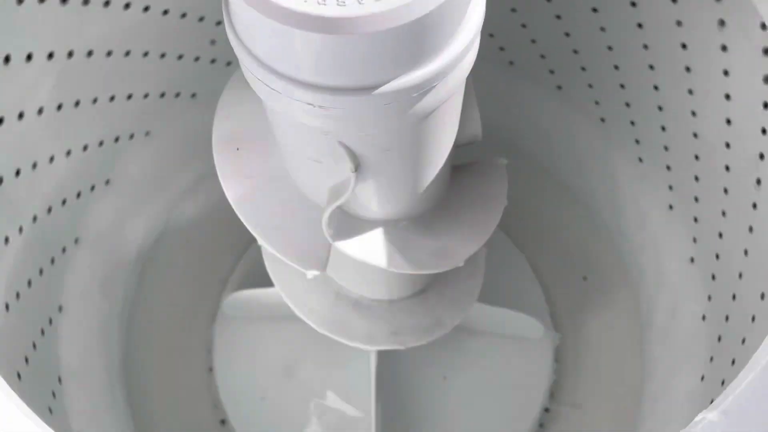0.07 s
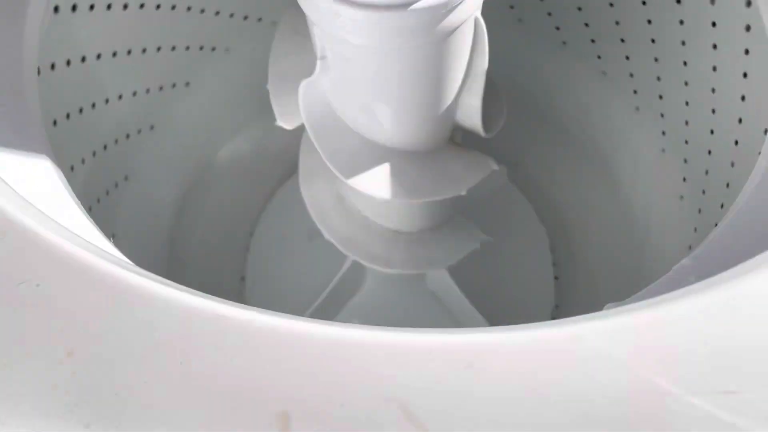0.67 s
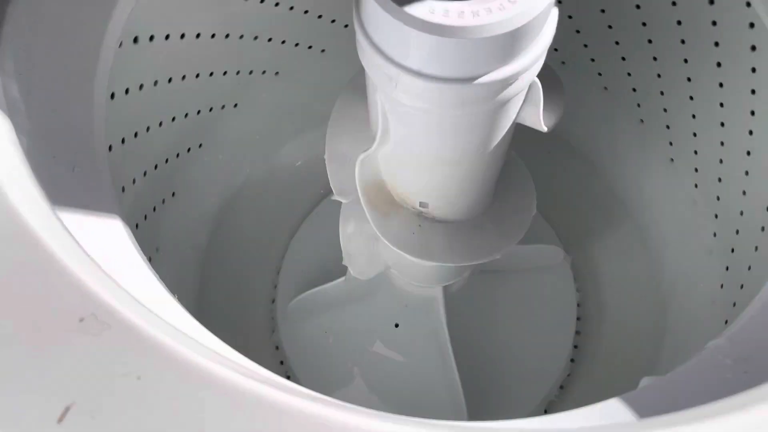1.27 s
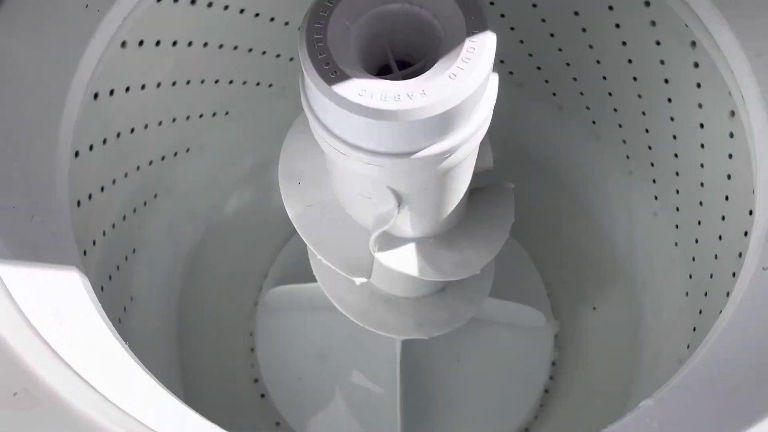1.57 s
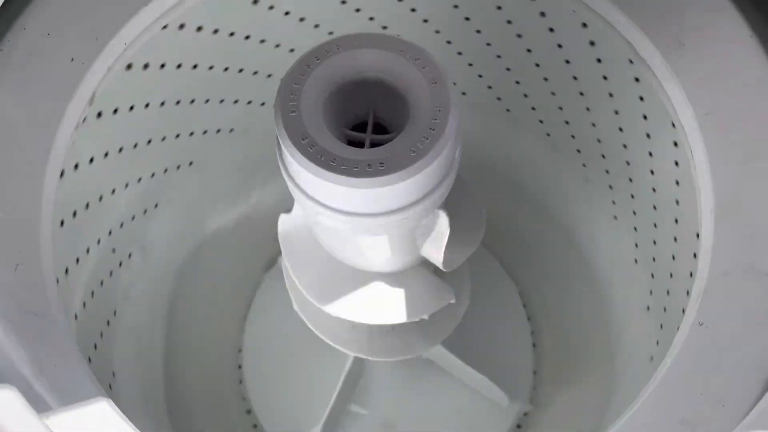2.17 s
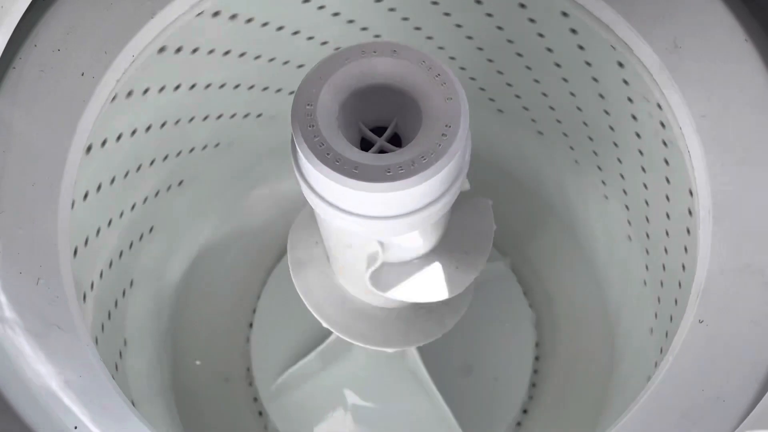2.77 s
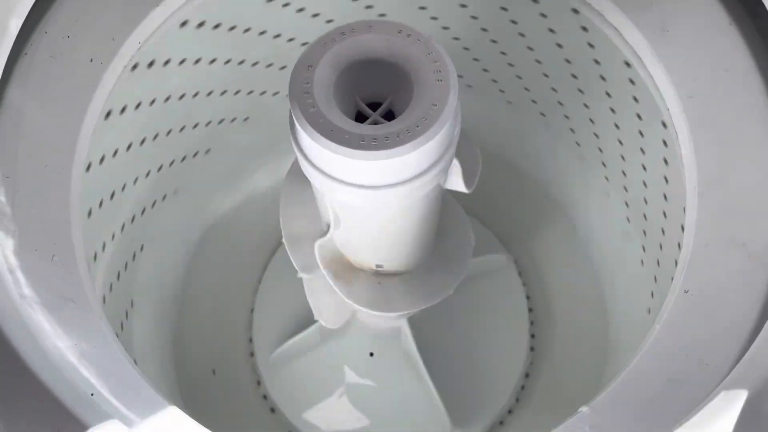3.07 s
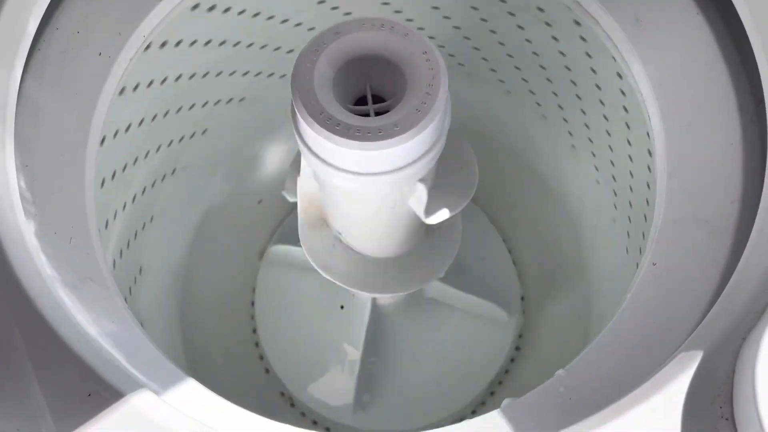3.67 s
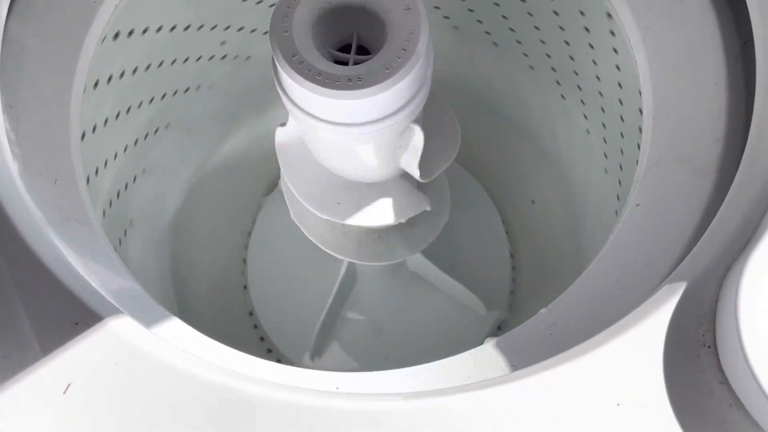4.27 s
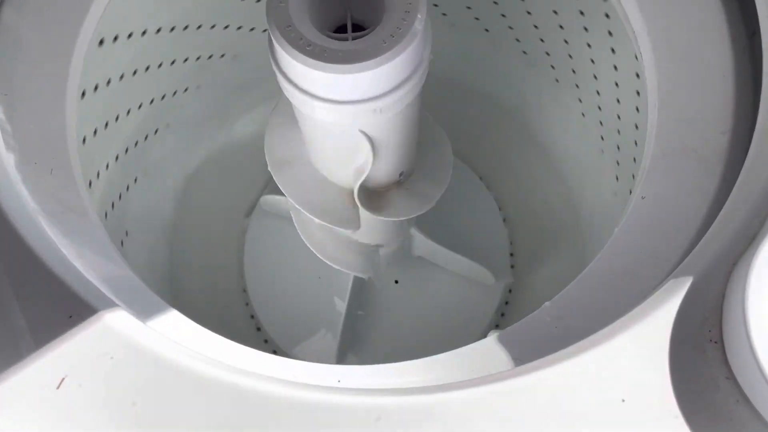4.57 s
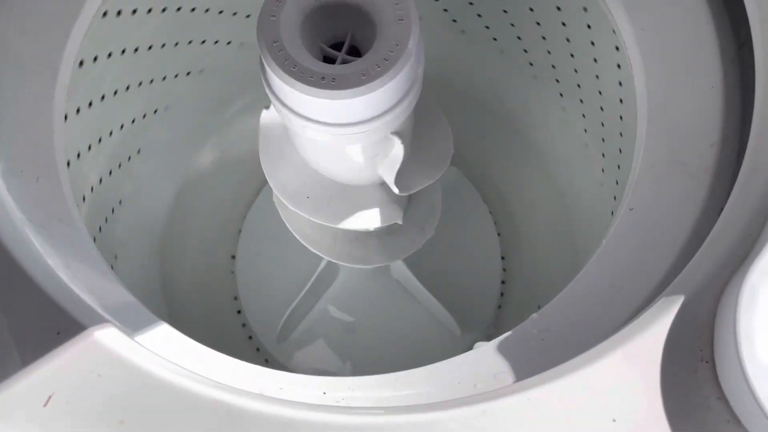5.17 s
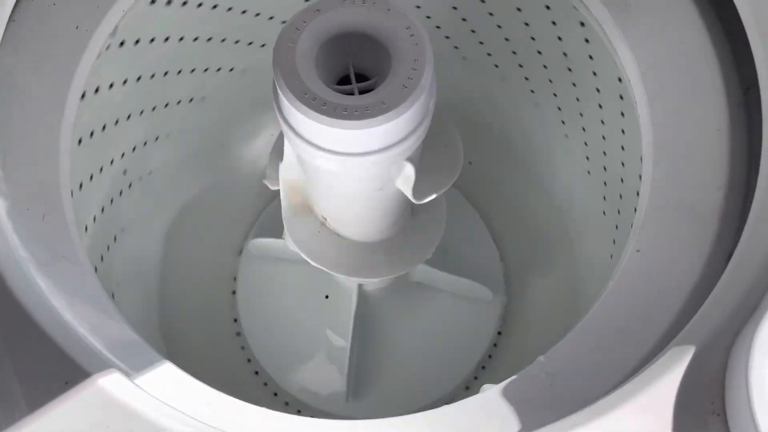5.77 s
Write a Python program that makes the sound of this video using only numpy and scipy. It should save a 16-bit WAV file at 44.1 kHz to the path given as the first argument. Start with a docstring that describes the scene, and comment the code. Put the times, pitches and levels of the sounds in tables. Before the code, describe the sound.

A top-loading washing machine spins its empty tub for all six seconds, heard close, just above the open lid. A low motor hum, a bass rumble and a fluttering midrange whirr run throughout. The hum is strongest in the first second, then eases, its throb quickening from about five to eight pulses a second. The belt adds a rough pattern that repeats about three times a second, and light, hollow cabinet bumps fall unevenly all along, with faint squeaks and ticks. Around 1 second the sound dips slightly as the microphone backs behind the rim. From about 2 seconds it leans over the opening, and a soft ring from the steel basket comes forward while an airy, hissing swish slowly grows. At about 5.8 seconds plastic strikes the tub in one quick, snapping clatter, and the spin carries on.

```python
"""A top-loading washing machine spins its empty tub, lid open, the microphone just above the rim.
The motor hums at twice the mains rate; reflected off the tub, the hum throbs faster as it gathers speed.
The drive belt brings the same rough spots round on every lap and bumps the cabinet. The tub rumbles,
swishes, squeaks and ticks, and near the end something clatters once. The microphone backs off behind
the rim for a moment, then leans in over the opening."""
import sys
import numpy as np
from scipy import signal
from scipy.fft import rfft, irfft, next_fast_len
from scipy.io import wavfile
from scipy.ndimage import map_coordinates

SR = 44100
rng = np.random.default_rng(int(sys.argv[2]) if len(sys.argv) > 2 else 0)


def materialize(psi):
    """Save the field psi as 16-bit PCM at rate SR to the path in sys.argv[1].

    A 1-D psi becomes a single channel; in a 2-D psi each row is a channel.
    """
    bounded = np.clip(np.atleast_2d(psi).T, -1, 1)
    quanta = np.round(bounded * 32767).astype(np.int16)
    wavfile.write(sys.argv[1], SR, quanta)


N = 265041
T = np.arange(N) / SR
SIDES = np.array([[1], [-1]])   # left, right
HUM_HZ, BELT_LAP_S = 119.94, .3457

# The tub gathering speed. Each row: time in seconds, throbs per second.
THROB_RATE = [(0, 4.8), (1, 5.539), (2, 6.174), (3, 6.711), (4, 7.223), (5, 7.69), (6.01, 8.428)]
# The microphone moving over the opening. Each row: time in seconds, lean from 0 to 1.
MIC_LEAN = [(0, 0.01), (.8, 0.05), (1.5, 0.2), (2.3, 0.72), (3.2, 0.89), (4.5, 0.91), (6, 0.92)]
# Left-right likeness and balance by frequency; the treble alternates between opposed and matching bands.
# Each row: frequency in Hz, likeness from -1 to 1, left minus right in dB.
LEFT_RIGHT = [(100, .975, .3), (260, .935, .1), (480, .8, 0), (800, .83, 2), (1150, .89, 3),
              (1450, .75, 2.5), (1750, .1, 2), (2200, .25, 0), (2650, .68, -2), (4500, .6, -1.7),
              (6100, .1, -2.5), (7000, -.99, 0), (8800, -.99, 0), (10300, .95, 0), (12300, .95, 0),
              (13800, -.98, 0)]
# Resonances of the steel basket. Each row: centre in Hz, width in Hz, boost in dB.
BASKET_MODES = [(590, 20, 2), (665, 38, 2.5), (702, 24, 3), (742, 15, 2.5), (1055, 9.2, 4), (1142, 27, 5.5),
                (1187, 39, 6), (1271, 35, 10.5), (1380, 80, 6.5), (1425, 30, 4.5), (1527, 31, 2),
                (1840, 160, 2.5), (2374, 58, 1.5), (2710, 44, 2.5), (3580, 100, 3), (3840, 89, 2.5),
                (4530, 420, 3), (4940, 120, 3.5), (5530, 110, 4.5), (6090, 130, 4.5)]


def from_db(db):
    """Decibels to gain."""
    return 10 ** (np.asarray(db) / 20)


def rms_one(x):
    """Scale to an rms of 1."""
    return x / np.sqrt(np.mean(x ** 2) + 1e-20)


def in_time(rows):
    """Every column of a curve, sample by sample."""
    s, *columns = np.transpose(rows)
    return [np.interp(T, s, c) for c in columns]


def at_hz(rows, hz):
    """Every column of a table, read on a log-frequency axis."""
    points, *columns = np.transpose(rows)
    return [np.interp(np.log(hz + 1e-9), np.log(points), c) for c in columns]


def drift(rate):
    """A smooth random curve of spread near 1, changing about `rate` times a second."""
    knots = rng.standard_normal(1024)
    return map_coordinates(knots, [T * rate], order=3, mode="wrap")


def coloured(spectrum, resonances=(), repeat=0.0):
    """Stereo noise of rms 1; a share `repeat` of its power comes back on every lap of the belt."""
    size = next_fast_len(N, real=True)
    hz = np.arange(size // 2 + 1) * SR / size
    white = rng.standard_normal((2, size))
    if repeat:
        lap = 2 * round(BELT_LAP_S * SR / 2)
        lap_noise = rms_one(irfft(np.exp(2j * np.pi * rng.random((2, lap // 2 + 1)))))
        white = np.sqrt(1 - repeat) * white + np.sqrt(repeat) * lap_noise[:, np.arange(size) % lap]
    level_db, = at_hz(spectrum, hz)
    octaves_outside = np.abs(np.log2((hz + 1e-9) / np.clip(hz, spectrum[0][0], spectrum[-1][0])))
    level_db -= 24 * octaves_outside
    for centre, width, boost_db in resonances:
        level_db += boost_db / (1 + (2 * (hz - centre) / width) ** 2)
    alike, pan_db = at_hz(LEFT_RIGHT, hz)
    mid, side = rfft(white)
    pair = np.sqrt(1 + alike) * mid + SIDES * np.sqrt(1 - alike) * side
    return rms_one(irfft(pair * from_db(level_db + SIDES * pan_db / 2), size)[:, :N])


def placed(x, hz):
    """Pan a tone by the left-right balance at its frequency."""
    _, pan_db = at_hz(LEFT_RIGHT, hz)
    return x * from_db(SIDES * pan_db / 2)


def swung(x, swing_db):
    """A source slides from right to left as the microphone leans in; it is centred at a lean of 0.37."""
    lean, = in_time(MIC_LEAN)
    return x * from_db(SIDES * swing_db * (lean - .37) / 2)


def noise_levels():
    """The level in dB of each noise follows the microphone's position and the tub's speed."""
    # Each entry, by noise: base level in dB, then dB added at full lean, when fully behind the rim,
    # and for each throb per second gained.
    responses = {"rumble": (-31, -3.5, -2, -1), "drone": (-32, 1.5, -3, -0.5),
                 "whirr": (-35, -4, -1.5, 0.61), "ring": (-47.5, 5.5, -1.5, 0.2),
                 "swish": (-44.5, -3, -4.5, 1.64), "hiss": (-48.5, -1.45, -1.8, 0.15)}
    # The microphone backs off and returns. Each row: time in seconds, tub hidden by the rim from 0 to 1.
    behind_rim = [(.25, 0.2), (1.1, 0.68), (2.2, 0.19)]
    lean, = in_time(MIC_LEAN)
    hidden, = in_time(behind_rim)
    rate, = in_time(THROB_RATE)
    levels = {name: base_db + lean_db * lean + rim_db * hidden + speed_db * (rate - rate[0])
              for name, (base_db, lean_db, rim_db, speed_db) in responses.items()}
    surge_db = 1.7 * np.exp(-.5 * ((T - .16) / .19) ** 2)   # one swell as the spin takes hold
    for name in ("whirr", "ring", "swish"):
        levels[name] += surge_db
    return levels


def motor_hum(waver_rad, left_lead_rad):
    """Reflections off the turning tub, shifted up and down by the throb rate, beat with the direct hum."""
    # The hum is loudest low by the cabinet. Each row: time in seconds, then levels in dB of the direct
    # hum, its reflection off nearing surfaces and its reflection off leaving ones.
    path_levels = [(0, -17.5, -28, -40), (.5, -19.5, -36, -39), (.9, -21.9, -38, -32),
                   (1.3, -27.5, -32.5, -40), (2.5, -27, -35.5, -39), (3.6, -29, -34.5, -47),
                   (4.4, -28, -35, -42), (5.3, -25.5, -38.5, -44), (6, -26.5, -39.5, -42)]
    direct, nearing, leaving = from_db(in_time(path_levels))
    rate, = in_time(THROB_RATE)
    turn = np.exp(2j * np.pi * (.326 + np.cumsum(rate) / SR))
    phase = 2 * np.pi * HUM_HZ * T + waver_rad * drift(21) + SIDES * left_lead_rad / 2
    second_bounce = from_db(-16) * turn   # hum that meets the tub twice
    reflected = nearing * turn * (1 + second_bounce) + leaving * turn.conj()
    return np.sqrt(2) * np.real(np.exp(1j * phase) * (direct + reflected))


def motor_tones(waver_rad, flutter_db):
    """Thin tones of motor and gears waver with the load."""
    # Each row: pitch in Hz, level in dB about which the tone flutters.
    tones = [(141.8, -41), (148.3, -44.5), (239.9, -43.5), (283.5, -41.5), (566, -54), (661, -56.5),
             (1079.4, -57)]
    out = 0
    for hz, level_db in tones:
        phase = 2 * np.pi * (hz * T + rng.random()) + waver_rad * hz / HUM_HZ * drift(8)
        gain = np.sqrt(2) * from_db(level_db + flutter_db * drift(14))
        out += placed(gain * np.sin(phase), hz)
    return out


def tub_rumble(level_db):
    """The turning tub rumbles in the bass."""
    # Each row: frequency in Hz, relative density in dB.
    spectrum = [(15, -28), (28, -20), (42, -14), (60, -0.5), (95, 0), (145, 0), (180, -8), (260, -7)]
    return from_db(level_db) * coloured(spectrum)


def drone(level_db):
    """A low drone from under the tub, part of it repeating with the belt."""
    # Each row: frequency in Hz, relative density in dB.
    spectrum = [(150, -52), (190, -8), (218, 5), (255, -3), (305, -0.5), (370, -2.5), (410, -6.5),
                (450, -12.5), (520, -20), (750, -30)]
    return from_db(level_db) * coloured(spectrum, repeat=.11)


def whirr(level_db):
    """A fluttering midrange whirr, coloured by the basket's resonances."""
    # Each row: frequency in Hz, relative density in dB.
    spectrum = [(380, -16), (440, -9), (480, -1), (520, -2.5), (600, 2), (680, 1), (820, 2), (1000, -1),
                (1200, -18.5), (1450, -13), (1700, -17.5), (2400, -20)]
    return from_db(level_db + drift(22.27)) * coloured(spectrum, BASKET_MODES, repeat=.1)


def basket_ring(level_db):
    """The steel basket rings on in a fluttering band just above 1 kHz."""
    # Each row: frequency in Hz, relative density in dB.
    spectrum = [(950, -11), (1050, 5), (1220, 1), (1290, -25), (1430, -10.5), (1560, -9), (1900, -15)]
    return from_db(level_db + 1.3 * drift(13)) * coloured(spectrum, BASKET_MODES, repeat=.066)


def tub_echoes(x, skew_s):
    """Dull echoes off the tub wall comb the noise; the teeth slide as the microphone moves. Rms 1."""
    # Each row: delay in seconds, its change at full lean in seconds, level in dB.
    echoes = [(.0031, .0006, -13), (.0058, -.0007, -12), (.0093, .0005, -11), (.0141, -.0006, -11),
              (.0207, .0004, -12)]
    lean, = in_time(MIC_LEAN)
    dull = signal.sosfilt(signal.butter(2, 7000, fs=SR, output="sos"), x)
    out = x.copy()
    for k, (delay, change, level_db) in enumerate(echoes):
        for channel, side in enumerate((1, -1)):
            late = delay + change * lean + side * skew_s * (-1) ** k   # from right and left in turn
            out[channel] += from_db(level_db) * np.interp(T - late, T, dull[channel])
    return rms_one(out)


def swish(level_db):
    """Air and stray water swirl round the basket and echo in the tub."""
    # Each row: frequency in Hz, relative density in dB.
    spectrum = [(900, 0.5), (1350, 0), (1650, 3), (2300, 3), (2550, -4), (2750, -3), (3200, -4.5),
                (4200, -11.5), (6000, -42)]
    return from_db(level_db) * tub_echoes(coloured(spectrum, BASKET_MODES), skew_s=.00003)


def hiss(level_db):
    """The treble of the swirl, which dips as the microphone passes behind the rim."""
    # Each row: frequency in Hz, relative density in dB.
    spectrum = [(2400, -10), (3300, -2), (5200, 0), (6600, -1), (8000, -5), (10000, -8), (12500, -14),
                (15500, -12)]
    # Each row: time in seconds, change of level in dB.
    rim_dip = [(0, 1.5), (.3, 0.9), (.7, -1), (1.0, -0.5), (1.3, 1)]
    dip_db, = in_time(rim_dip)
    return from_db(level_db + dip_db) * tub_echoes(coloured(spectrum, BASKET_MODES), skew_s=.00001)


def belt(uneven_db, slip_s, phase_spread_rad, judder_rad):
    """Each rough spot passes the pulley once a lap and swells a cabinet resonance, never quite the same."""
    # Each row: time into the lap in seconds, half length in seconds, pitch in Hz, typical peak in dB.
    rough_spots = [(.016, .018, 654, -38.5), (.018, .018, 570, -45), (.040, .017, 304, -33),
                   (.054, .022, 219, -32.5), (.078, .018, 567, -46), (.100, .026, 666, -44.5),
                   (.105, .024, 229, -35), (.152, .014, 825, -45), (.232, .014, 570, -45.5),
                   (.253, .018, 284, -34), (.299, .014, 296, -34), (.304, .014, 352, -35.5),
                   (.322, .014, 640, -43)]
    out = np.zeros((2, N))
    laps = np.arange(-1, N / SR / BELT_LAP_S + 1)
    for s, half_s, hz, level_db in rough_spots:
        strength, slip, shift = rng.standard_normal((len(laps), 3)).T
        lap = np.round((T - s) / BELT_LAP_S).astype(int) + 1
        since = T - s - laps[lap] * BELT_LAP_S
        peak = from_db(level_db + uneven_db * strength[lap])
        swell = peak * np.exp(-.5 * ((since - slip_s * slip[lap]) / half_s) ** 2)
        judder = judder_rad * drift(hz / 10)   # the rubber grips and slips about every ten cycles
        phase = 2 * np.pi * (hz * since + rng.random()) + phase_spread_rad * shift[lap] + judder
        out += placed(np.sqrt(2) * swell * np.sin(phase), hz)
    return out


def narrow_noise(hz, glide, width_hz, since):
    """A narrow, gliding band of noise; stereo, rms 1."""
    knots = rng.standard_normal((4, 8192))
    position = (since - since[0]) * width_hz
    a, b, c, d = [map_coordinates(row, [position], order=3, mode="wrap") for row in knots]
    alike, _ = at_hz(LEFT_RIGHT, hz)
    pair = np.sqrt(1 + alike) * (a + 1j * b) + SIDES * np.sqrt(1 - alike) * (c + 1j * d)
    carrier = np.exp(2j * np.pi * (hz + glide * since / 2) * since)
    return rms_one(placed(np.real(pair * carrier), hz))


def squeaks():
    """Narrow bands of noise swell and fade as short squeaks or longer swishes."""
    # Each row: time of the peak in seconds, half length in seconds, pitch in Hz, glide in Hz per
    # second, width in Hz, peak rms level in dB.
    swells = [(.04, .025, 2240, 0, 120, -47), (.32, .2, 2400, -500, 260, -51.5),
              (.4, .12, 1500, 0, 300, -44.5), (.805, .017, 2990, 0, 50, -52.5), (1.3, .6, 2652, 0, 60, -60),
              (1.33, .17, 2900, 0, 350, -54.5), (2.1, .21, 2190, 0, 90, -52),
              (2.46, .049, 2635, 0, 100, -51.5), (2.6, .3, 2560, 0, 200, -56),
              (2.9, .3, 1960, -280, 130, -53.5), (3.04, .031, 1098, 0, 160, -39.5),
              (3.557, .058, 1157, 0, 91, -41), (3.8, .45, 2330, 0, 70, -58),
              (4.075, .018, 2320, 0, 1100, -45), (4.321, .025, 2330, 0, 120, -50.5),
              (4.62, .017, 2290, 2500, 60, -49.5), (4.7, 1.2, 1950, 0, 55, -55.5),
              (5.059, .015, 1450, 0, 200, -41.5), (5.78, .1, 720, 0, 200, -39)]
    out = np.zeros((2, N))
    for s, half_s, hz, glide, width_hz, level_db in swells:
        near = np.abs(T - s) < 3.5 * half_s
        since = T[near] - s
        swell = from_db(level_db) * np.exp(-.5 * (since / half_s) ** 2)
        out[:, near] += swell * narrow_noise(hz, glide, width_hz, since)
    return out


def bumps():
    """Cabinet bumps and hollow tub knocks: one resonance swings up quickly and dies a little more slowly."""
    # Each row: time of the peak in seconds, pitch in Hz, peak rms level in dB, cycles to swing up.
    knocks = [(.043, 679, -32, 2), (.139, 823, -25, 1.5), (.150, 751, -30, 3), (.166, 817, -28.5, 1.4),
              (.2585, 254, -25, 1.3), (.328, 817, -29, 1.4), (.517, 754, -31, 2), (.577, 605, -32, 3),
              (.634, 257, -27.5, 2.5), (.715, 720, -29.5, 2), (.9915, 260, -24, 1.3),
              (1.3304, 774, -24, 1.3), (1.426, 281, -24.5, 1.3), (1.606, 680, -30, 2),
              (1.683, 306, -28, 1.5), (2.028, 276, -25, 1.2), (2.073, 240, -25.5, 2.4),
              (2.2274, 856, -24.5, 1.3), (2.2275, 1380, -34, 2), (2.374, 274, -27.5, 1.3),
              (2.509, 250, -27.5, 1.2), (2.616, 313, -27.5, 1.4), (2.719, 268, -26.5, 3),
              (2.829, 240, -27, 3.5), (2.85, 850, -33.5, 5), (2.961, 277, -26, 1.2),
              (3.066, 313, -27.5, 2.4), (3.132, 235, -29, 2.8), (3.412, 275, -26.5, 1.3),
              (3.455, 250, -28, 1.3), (3.468, 679, -25.5, 1.2), (3.480, 658, -29, 2), (3.72, 840, -34.5, 6),
              (3.799, 271, -27, 1), (3.822, 276, -26.5, 1.6), (4.104, 298, -22, 1.3),
              (4.130, 758, -29, 1.4), (4.434, 259, -27.5, 1.3), (4.448, 270, -26.5, 1.5),
              (4.792, 300, -30, 2), (4.809, 800, -29.5, 1.4), (4.926, 248, -26.5, 2),
              (5.1395, 287, -25, 1.3), (5.226, 309, -28, 1.4), (5.237, 269, -27, 1.8),
              (5.3475, 819, -29.5, 1.6), (5.45, 870, -34, 6), (5.470, 265, -26, 1.3),
              (5.525, 256, -27, 1.3), (5.55, 656, -33, 6), (5.69, 820, -32.5, 5), (5.825, 293, -23, 1.6),
              (5.905, 650, -33, 6)]
    out = np.zeros((2, N))
    for s, hz, level_db, rise_cycles in knocks:
        near = slice(max(int(s * SR) - SR // 20, 0), int(s * SR) + SR // 10)
        cycles = (T[near] - s) * hz
        age = np.maximum(1 + cycles / rise_cycles, 0)
        swing = (age * np.exp(1 - age)) ** 2 * np.sin(2 * np.pi * (cycles + rng.random()))
        out[:, near] += placed(np.sqrt(2) * from_db(level_db) * swing, hz)
    return out


def basket_ticks(per_s, low_hz, high_hz, softest_db, rise_s):
    """Faint ticks set the basket ringing at random pitches, the higher ones more softly."""
    out = np.zeros((2, N))
    for when, pitch, size, side in rng.random((int(per_s * N / SR), 4)):
        hz = low_hz * (high_hz / low_hz) ** pitch
        near = slice(int(when * N), int(when * N + 10 * rise_s * SR))
        since = T[near] - T[near][0]
        ping = since / rise_s * np.exp(1 - since / rise_s) * np.sin(2 * np.pi * hz * since)
        gain = from_db(softest_db + 3 * size) * np.sqrt(high_hz / hz)
        pan = np.sqrt([[2 * side], [2 - 2 * side]])
        out[:, near] += gain * pan * ping
    return out


def clatter(crack_db, tail_db, snap_db, tail_hz, attack_s):
    """Plastic strikes the tub in quick, snapping knocks, the first ones brightest, with a duller tail."""
    # Each row: start in seconds, base level in dB, extra level of its crack in dB.
    contacts = [(5.7535, -32, 3), (5.7565, -27, 2), (5.7615, -27, 2.5), (5.7675, -28, 1),
                (5.778, -29.5, -1.5), (5.790, -30.5, -4), (5.799, -35, -6)]
    # Spectra of the knocks and of their dry snap. Each row: frequency in Hz, relative density in dB.
    knock_spectrum = [(250, -10), (450, -2), (780, 1.5), (1300, -2.5), (2400, -6.5), (4000, -7),
                      (7000, -17), (10000, -13), (15500, -29)]
    snap_spectrum = [(1400, 0), (3000, -1), (6000, -9)]
    # The brief ring of the plastic. Each row: centre in Hz, width in Hz, boost in dB.
    plastic_modes = [(570, 60, 4), (760, 70, 7), (1140, 90, 6), (1450, 150, 4), (2200, 200, 2),
                     (3890, 230, 6), (5450, 220, 9), (9700, 300, 4), (11500, 400, 3)]

    def dying(s, db, t60_s):
        since = np.maximum(T - s, 0)
        return (1 - np.exp(-since / attack_s)) * from_db(db - 60 * since / t60_s)

    cracks = np.sqrt(sum(dying(s, db + crack_db + extra, t60_s=.04) ** 2 for s, db, extra in contacts))
    tails = np.sqrt(sum(dying(s, db + tail_db, t60_s=.11) ** 2 for s, db, _ in contacts))
    snaps = sum(dying(s, db + snap_db, t60_s=.009) for s, db, _ in contacts)
    lowpass = signal.butter(2, tail_hz, fs=SR, output="sos")
    dull = signal.sosfilt(lowpass, coloured(knock_spectrum, plastic_modes))
    bright = coloured(knock_spectrum, plastic_modes)
    return cracks * bright + tails * dull + snaps * coloured(snap_spectrum)


def scene():
    """At the rim: motor and belt from below; ring, swish and knocks from the open tub."""
    db = noise_levels()
    below = tub_rumble(db["rumble"]) + drone(db["drone"])
    belt_gain = from_db(db["drone"] - np.mean(db["drone"]))   # the belt rises and falls with the drone
    below += belt_gain * belt(uneven_db=2, slip_s=.004, phase_spread_rad=.7, judder_rad=.45)
    below += whirr(db["whirr"])
    ring = basket_ring(db["ring"])
    gusts = drift(18)   # air and water swirl unevenly
    swirl = swish(db["swish"] + 1.5 * gusts) + hiss(db["hiss"] + .2 * gusts)
    below += motor_hum(waver_rad=.059, left_lead_rad=.1) + motor_tones(waver_rad=.2, flutter_db=4.5)
    knocks = clatter(crack_db=-1.3, tail_db=2.3, snap_db=-1, tail_hz=2200, attack_s=.0003) + bumps()
    squeaking = squeaks()
    ticks = basket_ticks(per_s=14, low_hz=1600, high_hz=3200, softest_db=-53, rise_s=.007)
    return swung(below, swing_db=1.3) + swung(ring, swing_db=1.5) + swirl + squeaking + ticks + knocks


def record(dry):
    """The top is cut steeply above 15.75 kHz."""
    return signal.sosfilt(signal.ellip(12, .1, 80, 15750, fs=SR, output="sos"), dry)


dry = scene()
out = record(dry)
materialize(out)
```